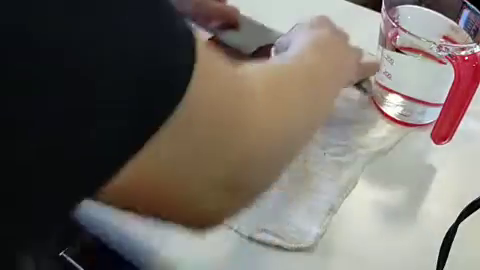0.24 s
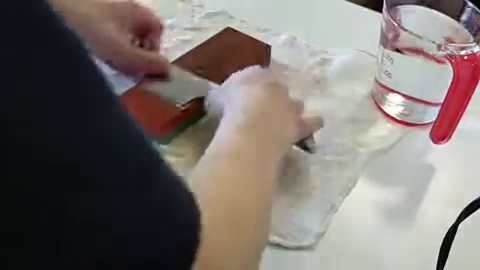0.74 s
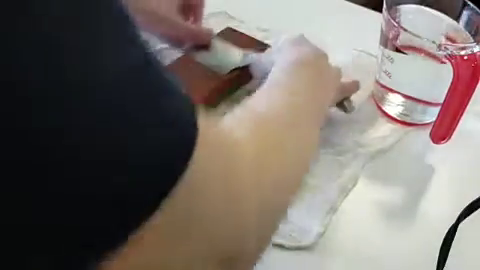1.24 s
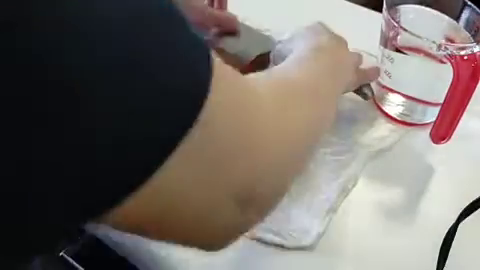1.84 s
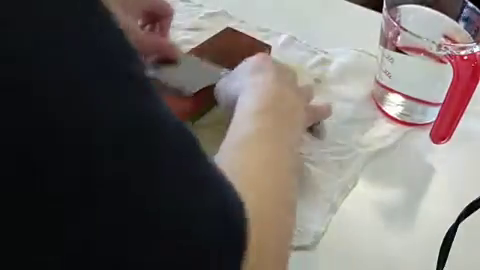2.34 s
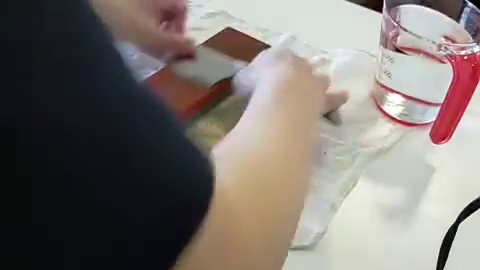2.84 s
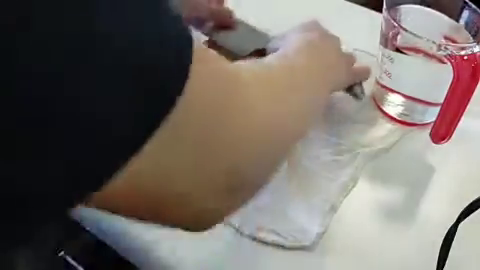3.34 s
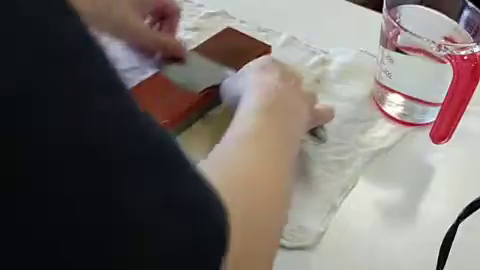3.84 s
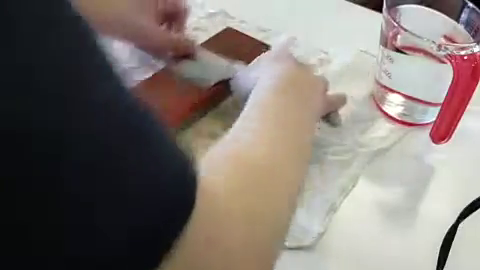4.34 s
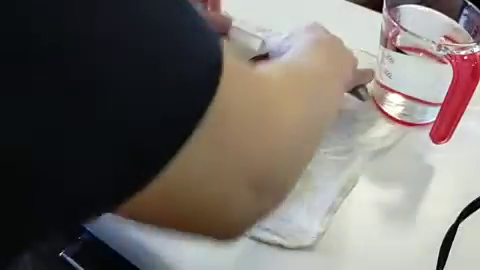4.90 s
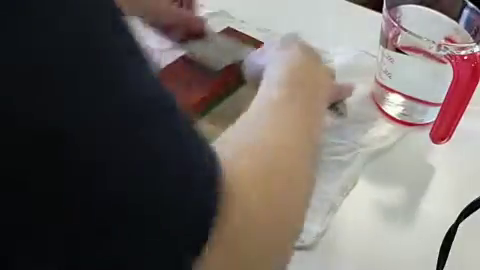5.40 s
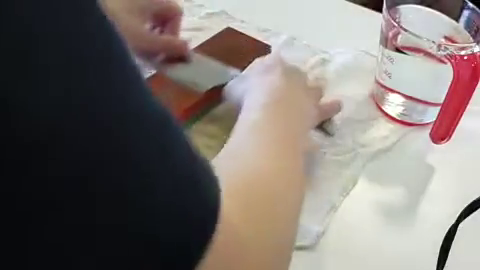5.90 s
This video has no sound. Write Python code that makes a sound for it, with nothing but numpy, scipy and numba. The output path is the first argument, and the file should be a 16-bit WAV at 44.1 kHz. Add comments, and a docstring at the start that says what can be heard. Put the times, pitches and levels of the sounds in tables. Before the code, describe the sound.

A kitchen knife is sharpened on a wet whetstone, heard close in a small room with faint steady background noise. One stroke is just ending at the start. Eight more follow evenly, landing at about 0.4, 1.1, 1.9, 2.7, 3.4, 4.2, 4.9 and 5.7 seconds. Each begins with a soft thud, muffled by a towel under the stone, then drags for roughly half a second as a gritty hiss with a bright steel ring, easing in the middle and swelling toward the tip. The landings at 0.4, 1.9, 2.7, 4.9 and 5.7 seconds add a light metallic clink. The tip often flicks the stone again as it lifts, and coarse grains give tiny ticks. The edge judders briefly near 0.75, 1.5 and 5.2 seconds, the last two with small knocks. The final stroke ends at about 6.1 seconds.

```python
"""Gritty, ringing swishes: a kitchen knife is sharpened on a wet whetstone in a small room.
The stone lies on a towel on a table. A stroke lands with a thud and drags the edge from heel to tip
over the grit, which hisses and sets the blade ringing. The tip often flicks the stone once more as it
lifts, and three strokes judder near their end."""
import sys
import numpy as np
from scipy import signal
from scipy.fft import rfft, irfft, next_fast_len
from scipy.io import wavfile
from numba import njit

SR = 44100
rng = np.random.default_rng(int(sys.argv[2]) if len(sys.argv) > 2 else 0)


def digitize_waveform(pressure):
    """Quantize a signal to 16-bit integers and store it at the path in sys.argv[1].

    Rows of a 2-D input are taken as channels; values are limited to [-1, 1].
    """
    field = np.atleast_2d(pressure).T
    bounded = np.clip(field, -1, 1)
    quanta = np.round(bounded * 32767).astype(np.int16)
    wavfile.write(sys.argv[1], SR, quanta)


N = 271656
TIME_S = np.arange(N) / SR

# Each row: times in seconds at which the edge starts, heel bites, push eases, tip presses, knife lifts;
# drag in dB at heel, belly, tip; ring offset in dB at heel, further on; brightness offset in dB at heel,
# further on; rasp offset in dB; main resonance in Hz at belly, tip.
STROKE_GESTURES = [ (-0.36, -0.3, -0.2, -0.05, 0.043,  -34, -39, -32,  0, -1.5,  0, -1,  -2,  3150, 3850),
                   (0.38, 0.44, 0.5, 0.74, 0.822,  -42, -41, -36,  4, 1,  0, 0.5,  2,  3200, 3830),
                   (1.15, 1.234, 1.258, 1.43, 1.566,  -36.5, -41.5, -35,  -1.5, 0.5,  3, 4.5,  -2,  3080, 3850),
                   (1.912, 1.975, 2.13, 2.255, 2.36,  -30, -38, -35.5,  2, 3.5,  1, 0,  0.5,  3080, 3550),
                   (2.695, 2.755, 2.88, 3.0, 3.096,  -33.5, -38.5, -34,  7, 4,  -0.5, -1,  1,  3000, 3600),
                   (3.43, 3.505, 3.6, 3.72, 3.82,  -31.5, -37.5, -31.5,  3, 2.5,  -1.5, 0.5,  -1.5,  3120, 3700),
                   (4.185, 4.25, 4.32, 4.48, 4.59,  -33, -39.5, -33.5,  2, 2.2,  -4, 2,  0.5,  3100, 3720),
                   (4.935, 4.975, 5.12, 5.24, 5.347,  -39.5, -45, -39,  4.5, 0.5,  2.5, 3,  -1,  3480, 3800),
                   (5.68, 5.75, 5.88, 6.03, 6.1,  -31.5, -39.5, -36.5,  -2, 0,  3, -4,  5,  3230, 3550), ]
# Response to a typical drag at start, heel, belly, tip. Each row: ring, rasp, hiss brightness, all in dB.
EDGE_RESPONSE = [(-43, -43, 1), (-32.3, -42.5, 0), (-30.3, -44, -1.5), (-30.7, -48.5, 2)]
# Each row: frequency in Hz at heel, belly, tip; width in Hz; relative level in dB at heel, belly, tip.
BLADE_MODES = [(1236, 1620, 1413, 80, -1.5, 3, 0), (1992, 2270, 1780, 114, 4, 1.5, -6),
               (2834, 2803, 3027, 83, -4, -3, 0.5), (3806, 3500, 3640, 73, 5.5, -1, 7),
               (4600, 4300, 4500, 70, 3.5, -2.5, 0), (5210, 4930, 4800, 37, -6.5, 1, -23),
               (5660, 5000, 5720, 88, 5, -3, 0), (6460, 6700, 8400, 100, 3.5, -4, -6),
               (7150, 7350, 7150, 120, 7.5, -3, -13), (7960, 7820, 8450, 190, -2, -3.5, -4),
               (9920, 9200, 10200, 190, -5.5, -36, -14)]
# Stone and table. Each row: frequency in Hz, width in Hz, relative level in dB.
STONE_MODES = [(161, 84, -9.5), (278, 103, 6.5), (556, 110, 3.5), (676, 49, -16.5), (860, 39, -24.5)]
# Blade lands or bumps. Each row: time in seconds; thud, low ring, high clink in dB; blade pitch ratio.
BLADE_KNOCKS = [(0.3888, -17.5, -26, -25, 1.0), (1.1351, -20, -34, -35.5, 0.985),
                (1.4634, -19.5, -34, -33, 1.4), (1.499, -27, -35, -35, 1.4), (1.8921, -19, -21, -30, 1.015),
                (2.659, -18, -22, -22.5, 0.995), (3.3878, -20.5, -36, -35, 0.98),
                (4.1524, -22, -39, -40, 0.99), (4.9339, -18.5, -20, -23, 1.02),
                (4.946, -37, -27, -28, 1.02), (5.196, -25, -34, -26, 1.3), (5.238, -25.5, -37, -37, 1.2),
                (5.285, -26, -32, -32, 1.27), (5.6723, -17, -21.5, -23, 1.07)]
# Tip brushes the stone on lifting. Each row: start and length in seconds, ring in dB, hiss in dB.
TIP_FLICKS = [(0.081, 0.021, -31, -38.5), (0.845, 0.012, -28, -37), (1.598, 0.018, -29.5, -35),
              (3.118, 0.012, -30, -40), (3.855, 0.05, -28.5, -34), (4.614, .028, -34, -37.5),
              (6.112, 0.036, -40, -44)]
# Edge catches a coarse grain. Each row: time in seconds, relative level in dB.
GRAIN_CATCHES = [(0.779, -9), (0.785, -15), (0.847, -16), (1.605, -17), (2.262, -17), (3.035, -13.5),
                 (3.045, -18), (3.066, -17), (3.898, -15), (4.475, -14), (4.55, -16), (6.041, -18),
                 (6.08, -16)]
# Lifted knife ticks. Each row: time in seconds, relative level in dB.
KNIFE_TICKS = [(1.869, -39), (4.762, -36)]
# Edge shakes the stone. Each row: start in seconds, length in seconds, level in dB.
EDGE_JUDDERS = [(0.734, 0.038, -40), (1.458, 0.09, -38.5), (5.192, 0.135, -37)]
# Near walls. Each row: delay in seconds, level in dB.
WALL_ECHOES = [(0.0157, -23), (0.0243, -20.5)]
# Spectra of grit hiss, room tail and background. Each row: frequency in Hz, relative level in dB.
GRIT_SPECTRUM = [(400, -13), (1000, -44), (1600, -29), (2200, -3.5), (3000, 7.5), (4200, -5), (5000, -2),
                 (7300, 4.5), (8800, 1), (9600, -4), (10400, -2.5), (12000, -8), (14500, -19)]
TAIL_SPECTRUM = [(100, 19), (250, 5.5), (600, 9), (1500, 4), (3600, -1), (7000, 3.5), (14000, -3)]
AMBIENCE_SPECTRUM = [(25, -13), (55, -11.5), (80, -14), (100, -11), (130, -2), (168, 2.5), (205, -1),
                     (280, -2), (420, -6), (1000, -14.5), (1700, -20.5), (3800, -24), (7000, -28.5),
                     (14000, -37.5)]

PLACES = (0, 1, 2)   # heel, belly, tip
FLAT_END, BENDING_END = 2, 4   # blade modes in order: flat, bending, upper


def blade(ring, hiss, rasp, pitch_hz, place, ring_db=0.76, hiss_db=-4.5, rasp_db=-6):
    """Grit drives the blade's modes: clear and gliding at the heel, one chattering band at the tip."""
    drive = grains(per_s=9000, clump_db=0.74 * place)
    stiffness = (pitch_hz / 3550) ** .35   # the grip raises all modes along with the main one
    modes = []
    for row in BLADE_MODES:
        hz, db = np.interp(place, PLACES, row[:3]), np.interp(place, PLACES, row[4:])
        rocking = drift(6.4)   # the hand rocks the edge, varying pitch and level
        bent_hz = hz * stiffness + np.maximum(70, 0.012 * hz) * rocking
        modes.append(from_db(db + 3.7 * np.roll(rocking, SR)) * resonate(drive, bent_hz, row[3]))
    flat = rms_one(sum(modes[:FLAT_END]))
    bending = rms_one(sum(modes[FLAT_END:BENDING_END]))
    upper = rms_one(sum(modes[BENDING_END:]))
    main = resonate(np.roll(drive, SR), pitch_hz, width_hz=335)
    main = resonate(main, pitch_hz, width_hz=1300)
    merged = np.interp(place, PLACES, [.08, .15, .65])
    band = np.sqrt(1 - merged) * bending + np.sqrt(merged) * main
    steel = from_db(ring_db) * ring * band + from_db(hiss_db) * hiss * upper
    steel += from_db(rasp_db) * rasp * flat
    return highpass(steel, 1150)   # a narrow blade radiates no bass


def after_ring(steel, hz=3600, width_hz=24, db=-10):
    """One lightly damped blade mode sings on after the edge lifts."""
    decay = np.exp(-np.pi * width_hz / SR)
    return from_db(db) * 2 * (1 - decay) * glide(steel, np.full(N, 2 * np.pi * hz / SR), decay)


def stroke(t, start_s, bite_s, ease_s, press_s, lift_s, heel_db, belly_db, tip_db,
           heel_ring_db, on_ring_db, heel_bright_db, on_bright_db, rasp_offset_db, belly_hz, tip_hz):
    """One pass from heel to tip: the drag sets the hiss; ring, rasp and brightness follow it."""
    rest_db, typical_db, tip_sag_db = -55, -36, 2.5
    heel_hz, heel_sag_hz = 3620, 70
    attack_s, tip_swell_s, release_s = 0.025, 0.055, 0.026
    roll_s, rolled_s = bite_s - 0.02, bite_s + 0.025   # the contact rolls off the heel
    held_s = bite_s + 0.3 * (ease_s - bite_s)
    turns_s = np.sort([start_s, bite_s, held_s, ease_s, press_s - tip_swell_s, press_s, lift_s])
    turns_db = [rest_db, heel_db, heel_db, belly_db, belly_db, tip_db, tip_db - tip_sag_db]
    drag_db = np.interp(t, turns_s, turns_db)
    push_db = drag_db - typical_db
    ring_db, rasp_db, bright_db = (np.interp(t, [start_s, bite_s, ease_s, press_s], column)
                                   for column in np.transpose(EDGE_RESPONSE))
    ring_db += 0.85 * push_db + np.interp(t, [held_s, ease_s], [heel_ring_db, on_ring_db])
    rasp_db += 0.7 * push_db + rasp_offset_db
    bright_db += 0.3 * push_db + np.interp(t, [held_s, ease_s], [heel_bright_db, on_bright_db])
    pitch_hz = np.interp(t, [roll_s, held_s, ease_s, press_s],
                         [heel_hz, heel_hz - heel_sag_hz, belly_hz, tip_hz])
    place = np.interp(t, [roll_s, rolled_s, press_s], PLACES)
    touching = np.clip(np.minimum((t - start_s) / attack_s, (lift_s - t) / release_s + .5), 0, 1)
    ring, hiss, rasp = touching * from_db([ring_db, drag_db, rasp_db])
    return ring, hiss, rasp, bright_db, pitch_hz, place


def hand(waver_db=1.2, waver_hz=20, judder_drag_db=-1.5):
    """Gains, brightness, main pitch and place on the edge through all strokes, judders and flicks."""
    controls = np.zeros((6, N))
    for row in STROKE_GESTURES:
        begun = TIME_S > row[0]
        controls[:, begun] = stroke(TIME_S[begun], *row)
    ring, hiss, rasp, bright_db, pitch_hz, place = controls
    ring *= from_db(waver_db * drift(waver_hz))   # uneven grip
    hiss = np.hypot(hiss, from_db(judder_drag_db) * juddering())
    for start_s, length_s, ring_db, hiss_db in TIP_FLICKS:
        brushing = gate(start_s, length_s, edge_s=0.009)
        ring += brushing * from_db(ring_db)
        hiss += brushing * from_db(hiss_db)
    return ring, hiss, rasp, bright_db, pitch_hz, place


def grit(hiss, bright_db, place, level_db=-3, top_hz=9500):
    """Abrasive hiss; its echo from the heel lags more as the contact moves away, making it swish."""
    direct = grains(per_s=20000, clump_db=2.1 + 0.35 * place)
    lag_s = 0.00096 + 0.000482 * place + .00006 * drift(2.5)
    echo = np.interp(np.arange(N) - lag_s * SR, np.arange(N), direct)
    rub = glinting(coloured(direct + (.7 - .2 * place) * echo, GRIT_SPECTRUM))
    top = signal.sosfiltfilt(signal.butter(3, top_hz, "high", fs=SR, output="sos"), rub)
    return from_db(level_db) * hiss * (rub + (from_db(bright_db) - 1) * top)


def glinting(rub, depth_db=3.2, rate_hz=14, width_ratio=0.045):
    """Narrow bands of the hiss flare and fade independently; rms 1."""
    out = rub.copy()
    for hz in np.geomspace(4900, 12500, 10):
        band = signal.lfilter(*signal.iirpeak(hz, 1 / width_ratio, fs=SR), rub)
        out += (from_db(depth_db * drift(rate_hz)) - 1) * band
    return rms_one(out)


def knocks(thud_hz=292, swell_s=0.0042, rock_db=-14, rock_t60_s=0.17, crack_s=0.0061):
    """Thuds smothered by the towel; harder landings wake the stone's other modes and the blade."""
    out, t = np.zeros(N), TIME_S[:SR // 8]
    other_modes = STONE_MODES[:1] + STONE_MODES[2:]
    body = sum(from_db(db) * struck(t, hz, width_hz) for hz, width_hz, db in other_modes)
    swell = t / swell_s * np.exp(.5 - .5 * (t / swell_s) ** 2)
    rocking = from_db(rock_db - 60 * t / rock_t60_s)   # the stone rocks on after the blow
    thud = (swell + rocking) * np.sin(2 * np.pi * thud_hz * t)
    for start_s, thud_db, ring_db, clink_db, ratio in BLADE_KNOCKS:
        clink = from_db(clink_db - 11) * rng.standard_normal(len(t)) * np.exp(-t / crack_s)
        for k, (heel_hz, _, _, width_hz, heel_db, _, _) in enumerate(BLADE_MODES):
            db = (ring_db - 8 if k < BENDING_END else clink_db - 14 + heel_db) + rng.normal(0, 2)
            hz = heel_hz * ratio * (1 + rng.normal(0, 0.006))
            clink += (-1) ** k * from_db(db) * struck(t, hz, .6 * width_hz)   # a resting edge damps less
        body_db = (thud_db + clink_db) / 2 - 3.5
        add(out, start_s, from_db(thud_db) * thud + from_db(body_db) * body + clink)
    return highpass(out, 105)


def catches(tip_hz=3700, swell_s=0.0012):
    """Coarse grains pluck the tip, which swells and dies within milliseconds."""
    out, t = np.zeros(N), TIME_S[:SR // 30]
    envelope = t / swell_s * np.exp(1 - t / swell_s)
    for start_s, db in GRAIN_CATCHES:
        hz = tip_hz * (1 + rng.normal(0, 0.032))
        tone = np.sin(2 * np.pi * hz * t) + 0.083 * rng.standard_normal(len(t))
        add(out, start_s, from_db(db - 3.5) * tone * envelope)
    return out


def ticks(decay_s=0.0022, band_hz=(2000, 4500)):
    """Tiny dry snaps of the lifted knife."""
    out, t = np.zeros(N), TIME_S[:SR // 30]
    bandpass = signal.butter(2, band_hz, "band", fs=SR, output="sos")
    for start_s, db in KNIFE_TICKS:
        snap = rng.standard_normal(len(t)) * np.exp(-t / decay_s)
        add(out, start_s, from_db(db + 2) * signal.sosfilt(bandpass, snap))
    return out


def stone(hiss, drag_db=-30.5, crunch_db=-12):
    """The stone rumbles faintly under the drag, and rumbles and crunches when the edge judders."""
    judder = juddering()
    drive = grains(per_s=2500, clump_db=2.5)
    body = sum(from_db(db) * resonate(drive, hz, width_hz) for hz, width_hz, db in STONE_MODES)
    body = rms_one(highpass(body, 100))
    drag = from_db(drag_db) * np.sqrt(hiss)
    return body * (drag + judder) + from_db(crunch_db) * judder * drive


def juddering():
    """Strength of the edge's judder over time."""
    return sum(from_db(db) * gate(start_s, length_s, .006) for start_s, length_s, db in EDGE_JUDDERS)


def room(x, t60_s=0.46, onset_s=0.0027, tail_db=-14):
    """Adds two wall echoes and a short diffuse tail."""
    t = TIME_S[:SR // 2]
    envelope = from_db(-60 * t / t60_s) * np.minimum(t / onset_s, 1)
    tail = coloured(rng.standard_normal(len(t)), TAIL_SPECTRUM) * envelope
    response = from_db(tail_db) * tail / np.linalg.norm(tail)
    for delay_s, db in WALL_ECHOES:
        response[round(delay_s * SR)] += from_db(db)
    return x + signal.fftconvolve(x, response)[:N]


def ambience(level_db=-51.5):
    """Steady background of the room."""
    return from_db(level_db) * coloured(rng.standard_normal(N), AMBIENCE_SPECTRUM)


def grains(per_s, clump_db):
    """Grit breaks under the edge: dense, uneven clicks in clumps; rms 1."""
    clicks = (rng.random(N) < per_s / SR) * rng.standard_normal(N)
    return rms_one(clicks * from_db(clump_db * np.clip(drift(144), -2, 2)))


def struck(t, hz, width_hz):
    """Free decay of one mode."""
    return np.exp(-np.pi * width_hz * t) * np.sin(2 * np.pi * hz * t)


def resonate(x, hz, width_hz):
    """Drive through a steady or moving resonance; rms 1."""
    return rms_one(glide(x, 2 * np.pi * hz / SR * np.ones(N), np.exp(-np.pi * width_hz / SR)))


@njit
def glide(x, step_rad, decay):
    """Resonator: a decaying rotation of variable speed."""
    out, state = np.empty(len(x)), 0j
    for i in range(len(x)):
        state = state * decay * complex(np.cos(step_rad[i]), np.sin(step_rad[i])) + x[i]
        out[i] = state.real
    return out


def coloured(x, spectrum):
    """Noise shaped by a spectrum; rms 1."""
    size = next_fast_len(len(x))
    hz, db = np.transpose(spectrum)
    bins_hz = np.maximum(np.fft.rfftfreq(size, 1 / SR), 1)
    gain = from_db(np.interp(np.log(bins_hz), np.log(hz), db))
    return rms_one(irfft(rfft(x, size) * gain, size)[:len(x)])


def drift(rate_hz):
    """Smooth random wander; rms about 1."""
    pole = np.exp(-2 * np.pi * rate_hz / SR)
    return rms_one(signal.lfilter([1], [1, -2 * pole, pole * pole], rng.standard_normal(N + SR))[SR:])


def gate(start_s, length_s, edge_s):
    """1 during a contact, with soft edges."""
    return np.clip(np.minimum(TIME_S - start_s, start_s + length_s - TIME_S) / edge_s + .5, 0, 1)


def highpass(x, hz, order=3):
    return signal.sosfilt(signal.butter(order, hz, "high", fs=SR, output="sos"), x)


def add(out, start_s, sound):
    i = round(start_s * SR)
    out[i:i + len(sound)] += sound[:N - i]


def from_db(db):
    return 10 ** (np.asarray(db) / 20)


def rms_one(x):
    return x / np.sqrt(np.mean(x ** 2) + 1e-20)


def scene(side_above_hz=4700, side_db=-2.3):
    """Knife and stone in the room; only the treble of hiss and background differs left to right."""
    ring, hiss, rasp, bright_db, pitch_hz, place = hand()
    steel = blade(ring, hiss, rasp, pitch_hz, place) + catches() + ticks()
    knife = steel + after_ring(steel) + grit(hiss, bright_db, place) + stone(hiss) + knocks()
    mid = room(knife) + ambience()
    side = room(grit(hiss, bright_db, place)) + from_db(-1.5) * ambience()
    side = from_db(side_db) * highpass(side, side_above_hz, order=12)
    return np.array([mid + side, mid - side])


def record(dry, cutoff_hz=14400):
    """Steep low-pass."""
    return signal.sosfilt(signal.ellip(10, .2, 80, cutoff_hz, fs=SR, output="sos"), dry)


dry = scene()
out = record(dry)
digitize_waveform(out)
```